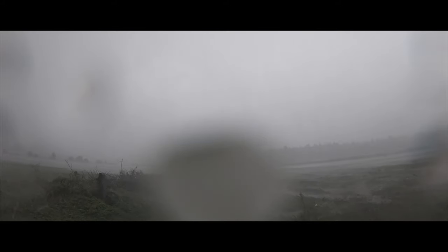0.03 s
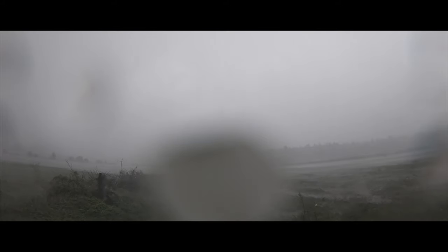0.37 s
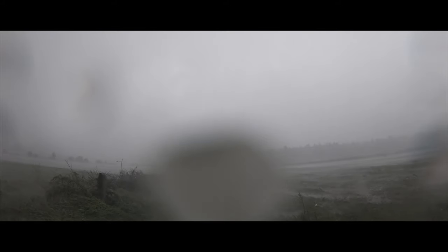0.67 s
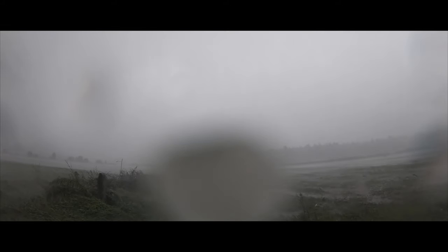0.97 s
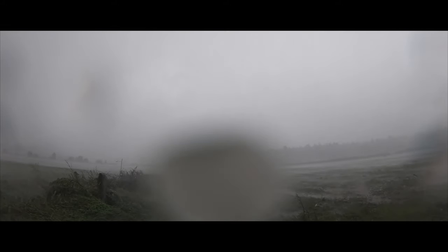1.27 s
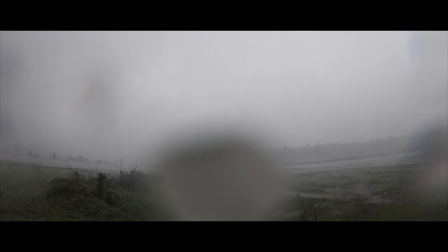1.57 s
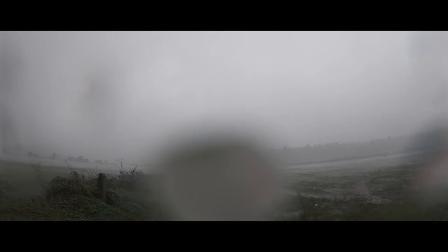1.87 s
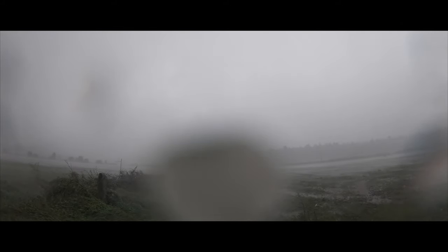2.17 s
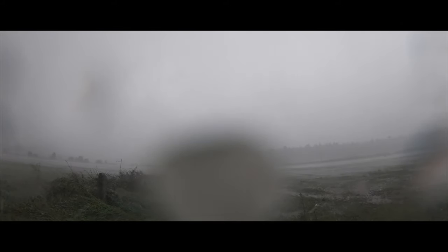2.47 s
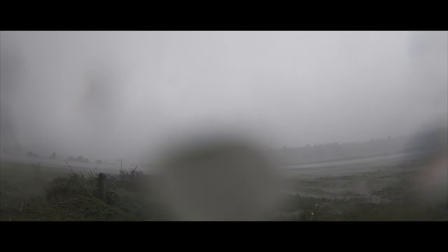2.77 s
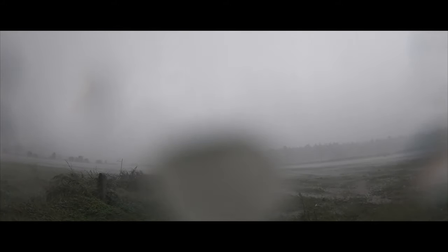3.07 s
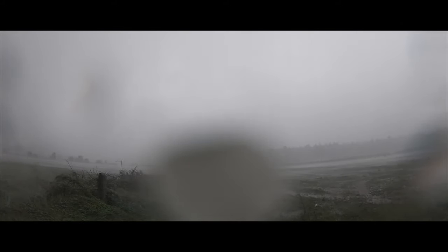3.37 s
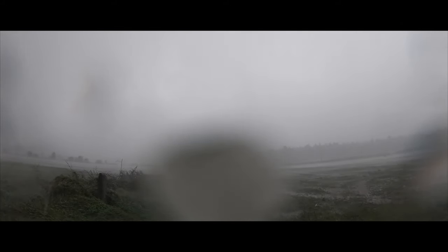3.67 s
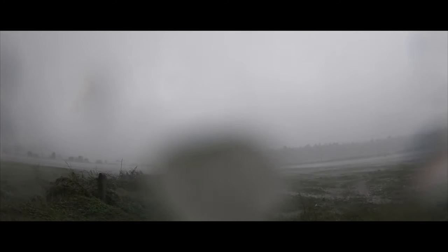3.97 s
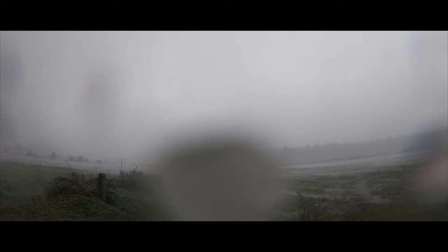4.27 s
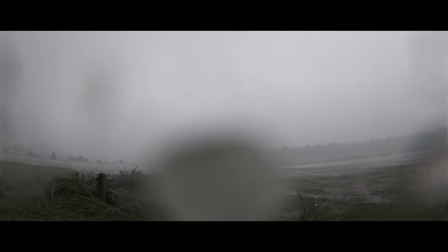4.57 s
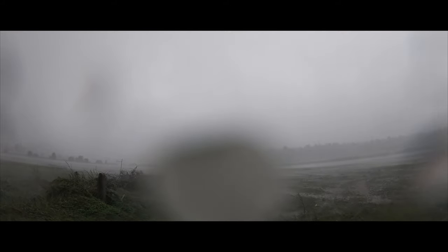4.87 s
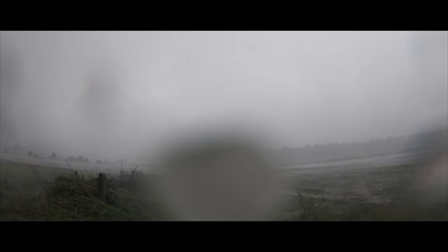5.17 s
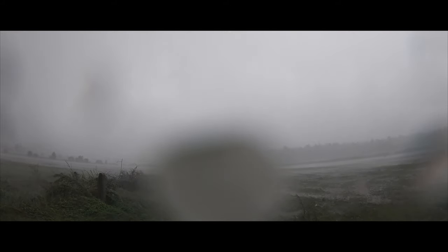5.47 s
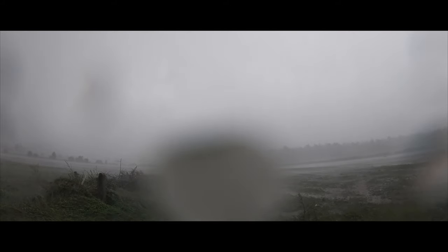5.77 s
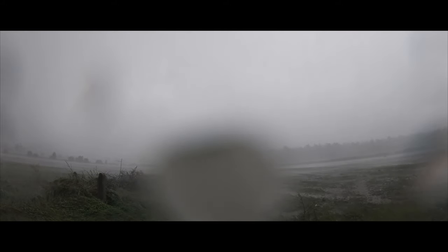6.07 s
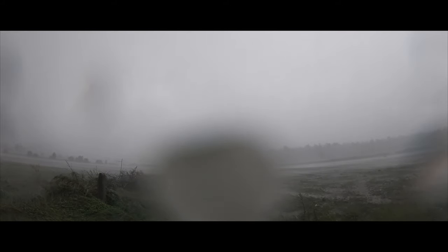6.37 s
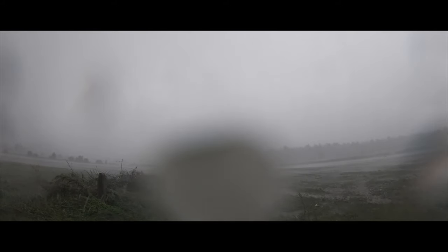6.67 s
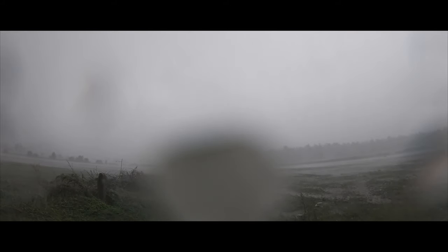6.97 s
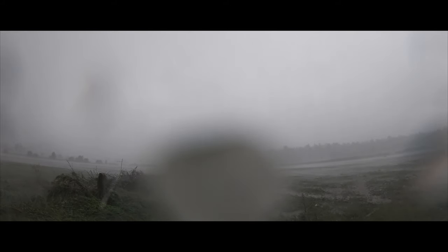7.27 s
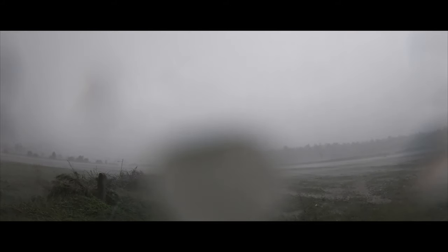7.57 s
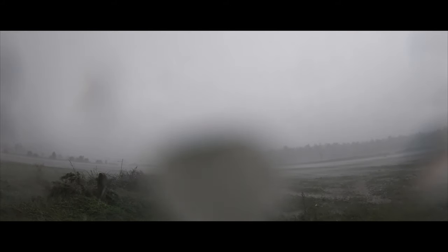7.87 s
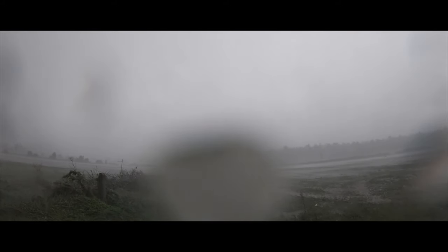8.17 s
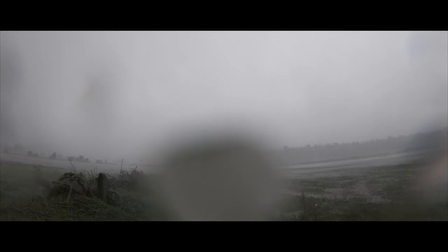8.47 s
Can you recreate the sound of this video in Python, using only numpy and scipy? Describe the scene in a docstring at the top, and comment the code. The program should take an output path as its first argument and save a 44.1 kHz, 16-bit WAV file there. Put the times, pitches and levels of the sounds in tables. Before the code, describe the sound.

Wind buffets a microphone out in a rainy field, with irregular drops ticking on glass and a faint storm roar behind.

```python
"""Gusts of wind rumble and thump on the microphone of a camera standing in a rainy field.
Swirls of air (eddies) shake the microphone, and rasp and crackle on the rim of its opening.
Big raindrops tap on the camera's glass and case, while smaller ones patter all around.
Behind them the storm roars in the grass and hedges, fine rain hisses,
and the wind moans faintly round an edge."""
import sys
import numpy as np
from scipy import signal
from scipy.fft import rfft, irfft
from scipy.io import wavfile
from scipy.ndimage import uniform_filter1d

SR = 44100
rng = np.random.default_rng(int(sys.argv[2]) if len(sys.argv) > 2 else 0)


def put_to_file(sound):
    """Save the sound as 16-bit audio at rate SR, in the file named by the first command-line argument."""
    columns = np.atleast_2d(sound).T  # one column per channel
    safe = np.clip(columns, -1, 1)
    whole_steps = np.round(safe * 32767)
    wavfile.write(sys.argv[1], SR, whole_steps.astype(np.int16))


N = 380583
TIME = np.arange(N) / SR

# The steady wind at the microphone: (time [s], level [dB])
STEADY_WIND = [(0, -35.5), (.3, -28.5), (.65, -33.5), (.92, -40.5), (1.1, -38.5), (1.35, -38.5),
               (1.55, -36.5), (1.78, -44), (1.99, -45), (2.17, -35), (2.8, -33.5), (3.4, -25), (3.9, -32),
               (4.45, -32), (4.8, -42.5), (5.1, -27), (5.5, -42), (6.06, -44.5), (6.3, -30.5),
               (7.95, -31.5), (8.63, -39)]
# Gusts on top of it: (peak time [s], level [dB], length [s], small eddies against large [dB])
GUSTS = [(0.166, -27.5, .14, 0.5), (0.496, -25.5, .12, -2.5), (1.056, -39, .16, 5.5),
         (1.179, -33.5, .16, 2.5), (1.577, -33.5, .05, 5.5), (1.667, -25, .1, -8),
         (1.918, -23.5, .11, -1.5), (2.08, -23, .12, -6.5), (2.358, -23.5, .18, -10),
         (2.477, -21, 0.083, -5), (2.643, -25, .2, -14), (3.002, -23.5, .18, -5.5),
         (3.226, -23.5, 0.21, 1.5), (3.353, -23.5, .07, 1), (3.55, -22, .11, -0.5), (3.66, -16, .15, -7.5),
         (4, -22.5, .05, -16), (4.101, -27.5, .17, 0), (4.268, -36.5, .22, -8), (4.95, -20, .16, -16),
         (5.302, -19.5, .24, -11), (5.578, -28.5, .1, -30), (5.696, -23, .1, -9), (6.265, -27, .15, 6),
         (6.372, -28.5, .09, 7), (6.648, -19.5, .1, -19), (6.844, -21, .22, -10), (7.073, -16.5, .16, -4),
         (7.201, -15.5, 0.11, -6), (7.293, -17, .08, -3), (7.408, -24, .07, -11), (7.606, -23, .16, -20),
         (7.74, -18, .15, -4), (7.847, -23.5, 0.076, -7.5), (8.164, -20, .14, -8), (8.28, -25, .1, -9),
         (8.436, -22.5, 0.15, -11)]
def airflow(steady_small_db=-2.5):
    """Strength of the large and of the small eddies: the steady wind and its gusts add in power."""
    large = undb(curves(STEADY_WIND)[0]) ** 2
    small = large * undb(steady_small_db) ** 2
    for s, db, length, small_db in GUSTS:
        gust = (undb(db) * arch(s, length, rise_share=.5)) ** 2
        large += gust
        small += gust * undb(small_db) ** 2
    return np.sqrt(large), np.sqrt(small)


# The deep rumble of large eddies: (frequency [Hz], level [dB])
LARGE_EDDY_SPECTRUM = [(10, -18), (22, -1.5), (50, 2.5), (80, 3.5), (115, -2), (150, -14.5), (220, -18),
                       (500, -54), (2000, -110)]
# The higher rush of small eddies: (frequency [Hz], level [dB])
SMALL_EDDY_SPECTRUM = [(80, -22), (135, 6.5), (175, 1), (240, -3), (320, -8.5), (420, -15.5), (700, -31),
                       (1200, -42), (2500, -48.5), (5000, -71.5), (10000, -115)]
def buffeting(large_flow, small_flow, flutter_db=3, burst_db=4, small_db=-1.78, surge_db=1.4):
    """Large eddies shake the microphone's thin membrane; small ones ride on them in bursts."""
    flutter = wander(55)
    large = steady(noise(LARGE_EDDY_SPECTRUM) * undb(flutter_db * flutter), 0.045)
    rush = noise(SMALL_EDDY_SPECTRUM)
    bursts = 0.94 * flutter + 0.62 * wander(110)
    small = steady(rush * undb(burst_db * bursts), 0.049)
    surge = undb(surge_db * wander(14))
    return (large * large_flow + small * small_flow * undb(small_db)) * surge


# Low thumps on the microphone; the last is an abrupt bump as the sound cuts off:
# (peak time [s], thump [dB], length [s], flap [dB])
THUMPS = [(1.905, -18, 0.013, -29.5), (1.924, -16.5, 0.015, -51), (1.946, -19, 0.015, -38),
          (2.071, -26, .012, -26), (2.266, -28, 0.023, -43), (2.33, -13.5, 0.031, -33),
          (2.37, -18, 0.025, -30), (2.96, -18, 0.027, -28.5), (3.191, -15, 0.0084, -34),
          (3.23, -26, 0.02, -30), (3.257, -36, 0.015, -32), (3.381, -28, 0.017, -26),
          (3.544, -27, 0.012, -27), (3.555, -21, 0.018, -35), (3.997, -22.5, 0.039, -38.5),
          (4.683, -20.5, 0.029, -42.5), (4.953, -29, 0.015, -27), (5.287, -19.5, 0.065, -33),
          (5.691, -17.5, 0.017, -33), (6.214, -18, 0.02, -32), (6.252, -13.5, 0.023, -16),
          (6.371, -16, 0.032, -29), (6.657, -27, 0.025, -32), (6.8, -26, 0.012, -22),
          (7.035, -20, 0.02, -28), (7.083, -10, 0.018, -20.5), (7.225, -23, 0.012, -30.5),
          (7.297, -12.5, 0.037, -27.5), (7.409, -14.5, 0.01, -28), (7.556, -14, 0.013, -27),
          (7.595, -15, 0.056, -27), (7.71, -19, 0.017, -42), (7.75, -11, 0.016, -17.5),
          (7.761, -7, 0.0082, -35), (7.846, -25.5, 0.018, -32.5), (8.134, -13.5, 0.033, -35),
          (8.156, -27, 0.013, -34), (8.194, -18.5, 0.015, -35), (8.288, -20, 0.024, -32.5),
          (8.442, -20.5, 0.069, -30.5), (8.462, -26, 0.0054, -30), (8.621, -13, 0.059, -19)]
# The dull body of a thump: (frequency [Hz], level [dB])
THUMP_SPECTRUM = [(40, -8), (130, 12), (230, 5), (400, -7), (700, -21.5), (1100, -30), (2000, -50),
                  (4000, -66), (10000, -110)]
# The ragged flap on top of it: (frequency [Hz], level [dB])
FLAP_SPECTRUM = [(180, 4), (380, 5.5), (650, 4), (1100, -10), (1800, -26.5), (3000, -34), (6000, -54.5),
                 (12000, -93)]
def thumps(thump_gain_db=-1.5, flap_gain_db=-1, ragged_db=5):
    """Each thump is a few violent pressure swings and a flap; all but the last are eddies striking."""
    body = steady(noise(THUMP_SPECTRUM), 0.013) * undb(thump_gain_db)
    flap = steady(noise(FLAP_SPECTRUM) * undb(ragged_db * wander(420)), 0.0084) * undb(flap_gain_db)
    out = np.zeros(N)
    for s, thump_db, length, flap_db in THUMPS:
        blow = arch(s, length, rise_share=0.39) ** 2
        out += blow * (body * undb(thump_db) + flap * undb(flap_db))
    return out


# The rasp at the rim: (frequency [Hz], level [dB])
RASP_SPECTRUM = [(250, -21), (500, 15), (800, -15.5), (1200, -5.5), (1900, -24), (3000, -37), (6000, -60.5),
                 (12000, -100)]
def rasp(pressure, gain_db=-23, knee=0.38):
    """On the strongest swings the air tears off the opening's rim with a ragged rasp."""
    force = loudness(pressure, 0.003) / knee
    strength = knee * force ** 1.13 / (1 + force)  # grows only slowly above the knee
    return noise(RASP_SPECTRUM) * strength * undb(gain_db)


# The crackle inside a gust: (frequency [Hz], level [dB])
CRACKLE_SPECTRUM = [(300, -8), (650, 5), (1300, -4), (2100, -14.5), (3200, -31.5), (6000, -48),
                    (12000, -86.5)]
def crackle(pressure, gain_db=-20, eddy_band_hz=(170, 600)):
    """Wet, fast little eddies break up on the opening's rim and crackle."""
    force = loudness(band(pressure, *eddy_band_hz), 0.0046)
    return shape(impacts(per_s=450, spread_db=3), CRACKLE_SPECTRUM) * force * undb(gain_db)


# The tones the case rings with: (pitch [Hz], length [cycles], level [dB])
CASE_TONES = [(4280, 2.1, 10.5), (5700, 10.6, 10.5)]
# The tones in a bursting drop's tick: (pitch [Hz], length [cycles], level [dB])
SPLASH_TONES = [(7800, 9.1, 1.5), (10000, 12, -16), (11800, 7.5, -25)]
# Big drops on the camera: (time [s], tap [dB], pitch [Hz], case ring [dB], knock [dB], splash [dB])
BIG_DROPS = [(.114, -23, 2470, -36.5, -34, -51), (.136, -19, 1390, -38.5, -31, -54),
             (.169, -22, 1800, -45, -37, -55), (0.371, -25.5, 1650, -49, -27.5, -55),
             (.455, -28.5, 1140, -50, -33, -60), (0.475, -20.5, 3030, -55, -36, -60),
             (.604, -21.5, 1640, -39.5, -37, -62), (1.156, -46, 1232, -45, -27, -48),
             (1.533, -26.5, 1800, -48.5, -39, -68), (1.608, -25, 2700, -53, -32, -49),
             (2.051, -22.5, 2110, -43, -43, -58), (2.076, -17, 1100, -45, -17, -57),
             (2.092, -20, 2080, -52, -50, -59), (2.317, -24.5, 1300, -54, -35, -64),
             (2.67, -19, 1604, -45, -32, -36), (2.753, -25, 1420, -62, -49, -62),
             (2.834, -28, 1050, -51, -42, -53), (2.884, -9, 3550, -52, -20.5, -46),
             (3.052, -35, 1610, -56, -40, -54), (3.063, -29, 1500, -60, -43, -60),
             (3.138, -29.5, 1320, -60, -45, -64), (3.177, -30.5, 2000, -58, -42, -60),
             (3.237, -15.5, 1840, -60, -24, -58), (3.357, -17, 1250, -64, -34, -60),
             (3.432, -26, 1250, -55, -45, -62), (3.517, -37, 1300, -45, -45, -52),
             (3.533, -23, 1420, -48, -36, -58), (3.595, -24, 1810, -58, -25, -61),
             (3.615, -20.5, 1544, -44, -28, -60), (3.634, -26, 1590, -53, -38, -58),
             (3.688, -39, 2600, -45.5, -41, -58), (3.732, -27.5, 2270, -58, -46, -65),
             (3.863, -28, 2070, -48, -45, -56), (3.944, -27, 1770, -59, -36, -62),
             (3.952, -25.5, 1080, -40.5, -39, -55), (3.967, -33, 1010, -44, -38, -55),
             (4.139, -23.5, 1090, -59, -24.5, -55), (4.528, -38, 1170, -54, -45, -52),
             (4.585, -44, 1050, -55, -45, -62), (4.632, -31, 1200, -56, -40, -57),
             (4.923, -13, 1740, -46, -38, -46), (4.972, -29, 3620, -48, -41, -42),
             (5.016, -36, 1200, -59, -35, -63), (5.032, -28, 1290, -59, -41, -58),
             (5.098, -39, 2900, -43, -44, -55), (5.161, -46, 2200, -53, -45, -51),
             (5.335, -34, 2170, -48, -50, -56), (5.396, -30, 1640, -60, -48, -61),
             (5.436, -31, 1600, -42.5, -47, -49), (5.544, -37, 2000, -56, -48, -62),
             (5.56, -27, 1630, -57, -46, -54), (5.668, -48, 1100, -48, -46, -56),
             (5.766, -26, 960, -63, -31, -60), (5.773, -36, 1177, -60, -43, -48),
             (5.805, -40, 3000, -47, -46, -57), (5.823, -32, 1047, -48, -45, -53),
             (5.835, -22.5, 1710, -48, -45, -58), (5.93, -27, 1070, -58, -38, -60),
             (5.991, -23, 1570, -44, -24.5, -47), (6.091, -13, 2800, -37, -39, -51),
             (6.186, -44, 1070, -51, -43, -50), (6.242, -25, 1400, -34.5, -44, -45),
             (6.301, -15, 2330, -43, -26, -45), (6.307, -25, 2930, -52, -40, -55),
             (6.346, -17, 1950, -50, -41, -47), (6.458, -27, 4120, -41, -42, -42),
             (6.52, -9, 1950, -31, -13.5, -59), (6.554, -25, 1110, -46, -33, -65),
             (6.613, -10.5, 1470, -52, -12, -39), (6.67, -41, 1500, -42, -46, -60),
             (6.682, -28, 1900, -52, -31, -62), (6.718, -32, 2360, -46, -40, -47),
             (6.752, -29, 3000, -48, -48, -61), (6.788, -18, 1200, -45, -22, -62),
             (6.859, -27, 1920, -42, -47, -58), (6.873, -29, 2890, -42, -50, -45),
             (6.938, -34, 3000, -53, -29, -57), (6.949, -32, 1390, -45, -27, -57),
             (6.965, -27, 1830, -47, -34, -40), (6.993, -30, 2010, -47, -42, -47),
             (7.086, -28, 1450, -56, -39, -62), (7.132, -33, 1390, -49, -34, -55),
             (7.161, -20, 1410, -51, -21, -49), (7.196, -21.5, 1500, -51, -37, -50),
             (7.236, -32, 1670, -52, -45, -51), (7.368, -28, 2820, -41, -51, -57),
             (7.41, -24.5, 1270, -44, -28, -52), (7.458, -40, 3300, -55, -48, -55),
             (7.54, -28.5, 2210, -44, -47, -51), (7.584, -27, 1710, -43, -39, -47),
             (7.61, -18, 2220, -46, -19, -43), (7.624, -26, 1650, -55, -39, -55),
             (7.7, -42, 3000, -47, -50, -54), (7.771, -9, 2320, -35, -11, -42),
             (7.992, -40, 1200, -44.5, -40, -64), (8.003, -22, 2300, -43.5, -37.5, -61),
             (8.072, -27.5, 1800, -57, -32, -59), (8.092, -40, 2020, -45, -49.5, -60.5),
             (8.235, -31, 1850, -45, -40, -63), (8.274, -19.5, 1780, -39, -33, -46),
             (8.319, -26.5, 1800, -43, -40, -54), (8.326, -26, 1150, -48, -41, -55),
             (8.486, -31.5, 1320, -44.5, -43, -54), (8.576, -38.5, 2520, -46.5, -40, -55)]
def taps(cycles=2.05, sag=0.058, overtone_ratio=1.48, knock_hz=650, lead_s=.0007, rebound_s=0.001386):
    """A big drop bursts and pushes the glass, lower in pitch as it spreads; the case knocks and rings."""
    out = np.zeros(N)
    for s, tap_db, hz, case_db, knock_db, splash_db in BIG_DROPS:
        tone = ring(hz, cycles, sag)
        overtone = undb(-12.5) * ring(hz * overtone_ratio, cycles * overtone_ratio, sag)
        glass = undb(tap_db - 5) * (tone + overtone)
        knock = undb(knock_db - 3.5) * ring(knock_hz * rng.uniform(1, 1.7), cycles=2.36, sag=sag)
        case = undb(case_db) * strike(CASE_TONES)
        splash = undb(splash_db - 2) * strike(SPLASH_TONES)
        add(out, s - lead_s, glass + knock + case + splash)
        delay = rebound_s * rng.uniform(0.93, 1.14)
        rebound = undb(tap_db - 11) * ring(hz * rng.uniform(0.62, 1), cycles)
        add(out, s - lead_s + delay, rebound)
    return out


# Water landing, in spatter and patter alike: (frequency [Hz], level [dB])
DROPLET_SPECTRUM = [(300, -19.5), (1000, -9.5), (1900, 6), (3300, -15), (4500, -2.5), (6000, 1),
                    (7200, -21), (10000, -48.5), (14000, -74.5)]
def spatter(droplets_db=-32, fade_s=0.0075, splat_db=-17, splat_s=0.00352):
    """Each big drop splats, then breaks into droplets that spatter on the glass for a moment."""
    fade = np.exp(-TIME[:SR // 25] / fade_s)
    splat = np.hanning(int(splat_s * SR))
    bursts = np.zeros(N)
    for s, db, *_ in BIG_DROPS:
        add(bursts, s, undb(db + droplets_db) * fade)
        add(bursts, s - splat_s / 2, undb(db + splat_db) * splat)
    return bursts * noise(DROPLET_SPECTRUM)


# The storm's strength, which plips and patter also follow: (time [s], level [dB])
STORM = [(0, -48.5), (.14, -43.5), (.5, -49.5), (1.9, -49), (2.16, -47.5), (2.57, -50), (2.95, -47),
         (3.17, -50), (3.99, -49.5), (4.25, -53), (5.05, -47.5), (6.03, -49.5), (6.47, -44), (7.3, -52.5),
         (8.63, -51.5)]
# The far-off roar: (frequency [Hz], level [dB])
ROAR_SPECTRUM = [(100, 11), (300, 8), (550, 5), (1050, 2), (1450, -3), (1900, -7.5), (2500, -11),
                 (3300, -16.5), (4100, -20), (5000, -58.5), (6500, -12.5), (7200, -25.5), (8500, -29),
                 (11000, -49), (14000, -75.5)]
def roar(gain_db=5, flicker_db=1.5):
    """Wind and rain in the grass and hedges, smooth with distance."""
    storm_db, = curves(STORM)
    return noise(ROAR_SPECTRUM) * undb(storm_db + gain_db + flicker_db * wander(32))


def plips(flow, count=100, gain_db=11, spread_db=2.5, low_hz=1050, high_hz=2700):
    """Medium drops, each with its own short note; gusts fling more of them."""
    out = np.zeros(N)
    storm_db, = curves(STORM)
    flung = np.cumsum(flow ** .6)  # climbs faster in a gust, so more drops land there
    for when, chance, pitch in rng.random((count, 3)):
        i = np.searchsorted(flung, when * flung[-1])
        db = storm_db[i] + gain_db - spread_db * np.log(max(chance, .02))
        hz = low_hz * (high_hz / low_hz) ** pitch
        add(out, TIME[i], undb(db) / (1 + pitch) * ring(hz, cycles=2.2))  # big, low drops are louder
    return out


# Small ticks on the case: (frequency [Hz], level [dB])
TICK_SPECTRUM = [(1000, -24), (2500, -14.5), (4000, -11.5), (5800, 7), (7100, -10), (8500, -18.5),
                 (9500, -15), (11000, -28), (14000, -54.5)]
def patter(pat_db=-10, tick_db=-23):
    """Small drops pat on the wet ground and tick on the case, harder when the storm swells."""
    storm_db, = curves(STORM)
    pats = shape(impacts(per_s=260, spread_db=2), DROPLET_SPECTRUM) * undb(pat_db)
    ticks = shape(impacts(per_s=25, spread_db=3), TICK_SPECTRUM) * undb(tick_db)
    return (pats + ticks) * undb(storm_db)


# The strength of the fine rain: (time [s], level [dB])
FINE_RAIN = [(0, -43.5), (.3, -48), (1.5, -48), (2.1, -45), (2.5, -49), (2.95, -49), (3.3, -52), (3.9, -53),
             (5.0, -45.5), (5.65, -47), (6.6, -43.5), (7.4, -52), (8.63, -48.5)]
# Its high hiss: (frequency [Hz], level [dB])
HISS_SPECTRUM = [(3000, -73), (3800, -9.5), (4300, 2.5), (4700, 7.5), (5600, 6), (6100, 1.5), (6600, -25.5),
                 (7100, -78), (9000, -58)]
def hiss(gain_db=-2.5, grain_db=-8, flicker_db=1):
    """Countless fine drops merge into a high, slightly grainy hiss."""
    rain_db, = curves(FINE_RAIN)
    grains = shape(impacts(per_s=1000, spread_db=5.5), HISS_SPECTRUM)
    spray = noise(HISS_SPECTRUM) + undb(grain_db) * grains
    return spray * undb(rain_db + gain_db + flicker_db * wander(57))


# Lulls in the hiss: (time [s], level change [dB], band centre [Hz], band width [Hz])
LULLS = [(.8, 1.5, 5750, 500), (.95, -5, 5720, 840), (1.27, -7, 5680, 950), (1.45, -6.5, 5550, 1400),
         (1.63, -14, 5400, 1700), (1.675, -12, 5330, 1550), (1.82, -25, 5400, 1830),
         (1.93, -14, 5340, 1950), (2.02, -18, 5350, 2000), (2.06, 1.5, 5390, 2010), (4.41, 2, 5290, 300),
         (4.5, -28, 5150, 705), (4.55, -24, 5230, 1440), (4.7, -23, 5380, 1920), (4.82, -13, 5300, 2100),
         (4.88, -8, 5260, 1890), (4.91, 1, 5300, 1900), (5.78, -0.5, 5670, 600), (5.86, -14, 5680, 750),
         (5.94, -16, 5650, 850), (6, -5, 5560, 800), (7.6, 1.5, 5900, 504), (7.9, 1.5, 6000, 600),
         (8.3, -5, 6100, 606)]
# The loudest spits of hiss in the lulls: (time [s], level [dB])
SPITS = [(1.073, -34), (1.379, -41), (1.39, -31.5), (1.659, -28.5), (1.719, -39), (1.749, -41),
         (1.849, -27.5), (1.908, -29), (1.962, -40), (2.039, -30), (4.621, -48), (4.655, -48), (4.664, -46),
         (4.804, -43), (4.839, -31), (4.851, -27.5), (4.896, -29)]
def sputter(rain, flicker_db=8, spit_gain_db=-1, spit_s=0.0011, spit_band_hz=(4400, 6300)):
    """Now and then the middle of the hiss sinks away in a widening band and returns in short spits."""
    hz, times, spectra = signal.stft(rain, SR, nperseg=512)
    change_db, centre, width = (np.interp(times, TIME, c) for c in curves(LULLS))
    flicker = np.interp(times, TIME, wander(160))
    in_band = 1 / (1 + (2 * (hz[:, None] - centre) / width) ** 16)
    lull_db = change_db + flicker_db * flicker * (1 - undb(change_db))  # deep lulls flicker most
    out = signal.istft(spectra * undb(lull_db * in_band), SR)[1][:N]
    spit = steady(band(rain, *spit_band_hz), spit_s) / 2
    for s, db in SPITS:
        out += spit * undb(db + spit_gain_db) * np.exp(-((TIME - s) / spit_s) ** 2)
    return out


# Swells of the moaning wind: (peak time [s], pitch [Hz], level [dB], length [s])
MOANS = [(1.402, 585, -51, 1.34), (2.356, 598, -64, 0.44), (4.905, 654, -44.5, 0.31),
         (6.456, 594, -43, 0.396), (8.51, 654, -50.5, 0.34)]
def moan(rest_hz=560, rest_db=-64, width_hz=150, waver_db=6.5):
    """Eddies peeling off an edge make a breathy, broken note that rises with each swell of wind."""
    hz, gain = rest_hz, undb(rest_db)
    for s, peak_hz, db, length in MOANS:
        swell = arch(s, length)
        hz += (peak_hz - rest_hz) * swell
        gain += undb(db) * swell ** 2
    phase = 2 * np.pi * np.cumsum(hz) / SR
    tone = wander(width_hz) * np.cos(phase) + wander(width_hz) * np.sin(phase)
    return steady(tone * undb(waver_db * wander(30)), 0.11) * gain


def impacts(per_s, spread_db):
    """Clicks at random times: many small, a few large."""
    when, size, side = rng.random((3, N))
    gain = undb(-spread_db * np.log(np.maximum(size, .02)))
    return (when < per_s / SR) * gain * np.sign(side - .5)


def ring(hz, cycles, sag=0):
    """A soft-edged note that dies quickly; sag lets its pitch fall as it fades."""
    age = 6 * TIME[:SR // 50] * hz / cycles
    envelope = (age / 3) ** 3 * np.exp(3 - age)
    bend = 1 + sag * np.tanh(1 - age / 3)
    return envelope * np.sin(2 * np.pi * (np.cumsum(bend) * hz / SR + rng.random()))


def strike(tones, detune=0.086):
    """Several tones ring together, tuned a little differently at each spot a drop hits."""
    return sum(undb(db) * ring(hz * (1 + detune * rng.uniform(-1, 1)), cycles)
               for hz, cycles, db in tones)


def arch(s, length, rise_share=0.54):
    """A rounded swell from 0 up to 1 at time s and back to 0."""
    age = (TIME - s) / length
    from_peak = np.maximum(-age / rise_share, age / (1 - rise_share))
    return np.cos(np.pi / 2 * np.minimum(from_peak, 1))


def shape(x, spectrum):
    """Turn each frequency of x up or down by a table, then scale the result to strength 1."""
    hz, db = np.transpose(spectrum)
    f = np.maximum(np.arange(N // 2 + 1) * SR / N, 1)
    y = irfft(rfft(x) * undb(np.interp(np.log(f), np.log(hz), db)), N)
    return y / y.std()


def noise(spectrum):
    """Noise with the given mix of frequencies."""
    return shape(rng.standard_normal(N), spectrum)


def band(x, low_hz, high_hz):
    """The part of x between two frequencies."""
    f = np.arange(N // 2 + 1) * SR / N
    inside = (np.tanh((f - low_hz) / 60) - np.tanh((f - high_hz) / 60)) / 2
    return irfft(rfft(x) * inside, N)


def smooth(x, seconds):
    """Two running averages in a row."""
    size = max(int(seconds * SR), 1)
    return uniform_filter1d(uniform_filter1d(x, size), size)


def loudness(x, seconds):
    """The strength of x from moment to moment."""
    return np.sqrt(smooth(x ** 2, seconds) + 1e-12)


def steady(x, seconds):
    """Even out swells slower than the given time."""
    return x / loudness(x, seconds)


def wander(per_s):
    """A random drift of typical size 1 that turns about per_s times a second."""
    y = smooth(rng.standard_normal(N), 1 / per_s)
    return y / y.std()


def curves(table):
    """Each column of a table, joined by straight lines in time."""
    s, *columns = np.transpose(table)
    return [np.interp(TIME, s, c) for c in columns]


def add(out, s, sound):
    """Mix a sound into out from time s."""
    start = int(np.clip(s * SR, 0, N - 1))
    out[start:start + len(sound)] += sound[:N - start]


def undb(db):
    """Decibels to gain."""
    return 10 ** (np.asarray(db) / 20)


def scene():
    """Wind on the microphone, big drops on the camera and the storm behind them, in one channel."""
    large_flow, small_flow = airflow()
    wind = buffeting(large_flow, small_flow) + thumps()
    storm = sputter(roar() + hiss() + patter() + plips(large_flow))
    big_drops = taps() + spatter()
    return (wind + rasp(wind) + crackle(wind) + big_drops + storm + moan())[None]


def record(dry):
    """The camera softens the strongest blows and cuts the treble above 13500 Hz."""
    rounded = np.tanh(1.405 * dry) / 1.195
    treble_cut = signal.ellip(8, .2, 70, 13500, fs=SR, output="sos")
    return signal.sosfilt(treble_cut, rounded)


dry = scene()
out = record(dry)
put_to_file(out)
```